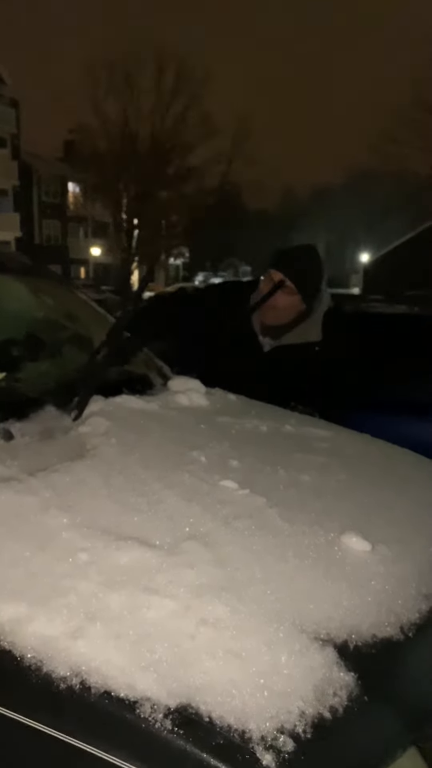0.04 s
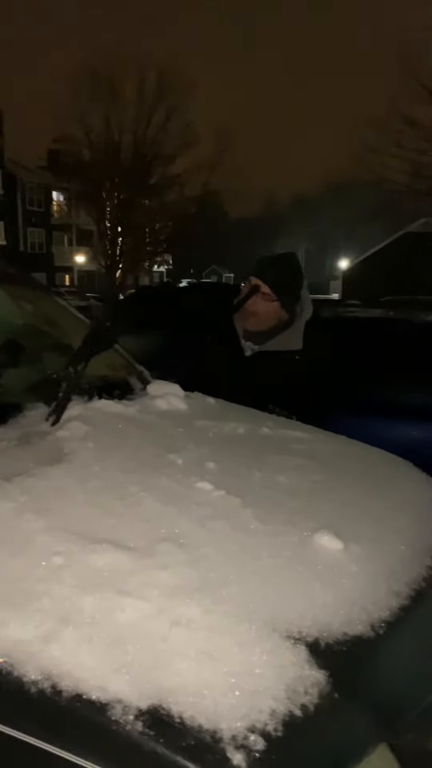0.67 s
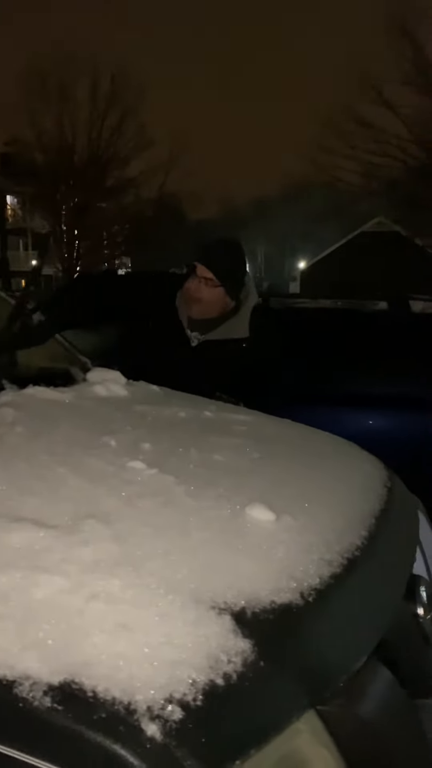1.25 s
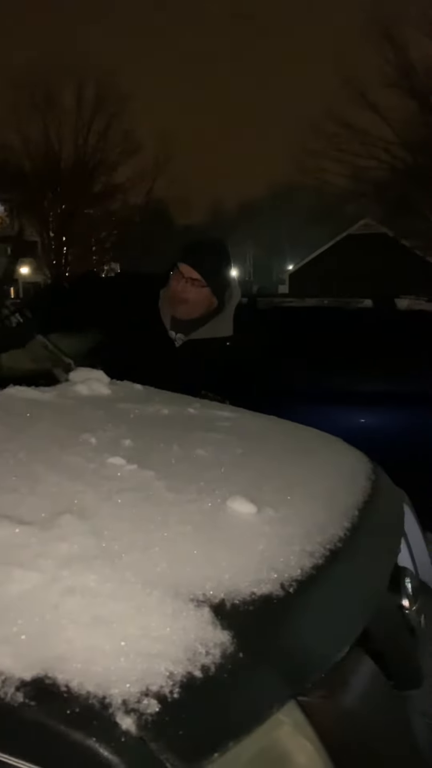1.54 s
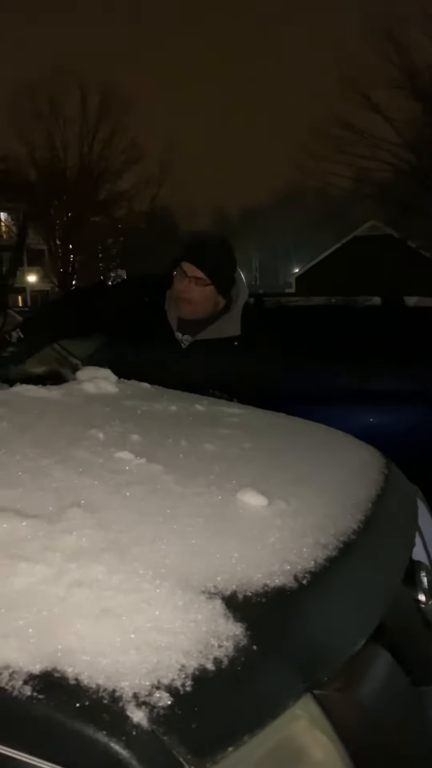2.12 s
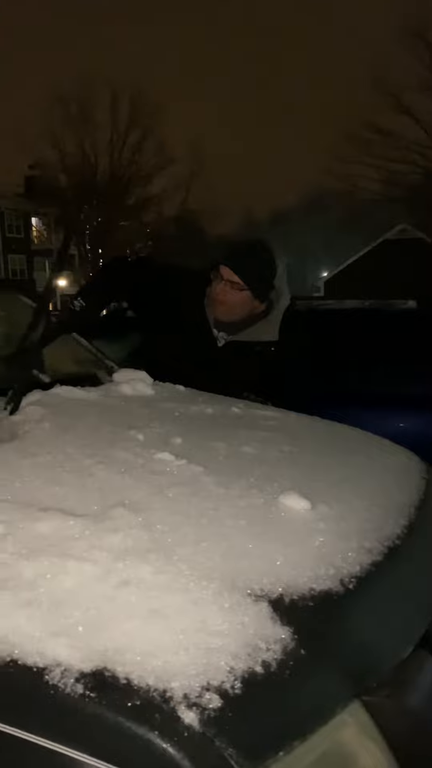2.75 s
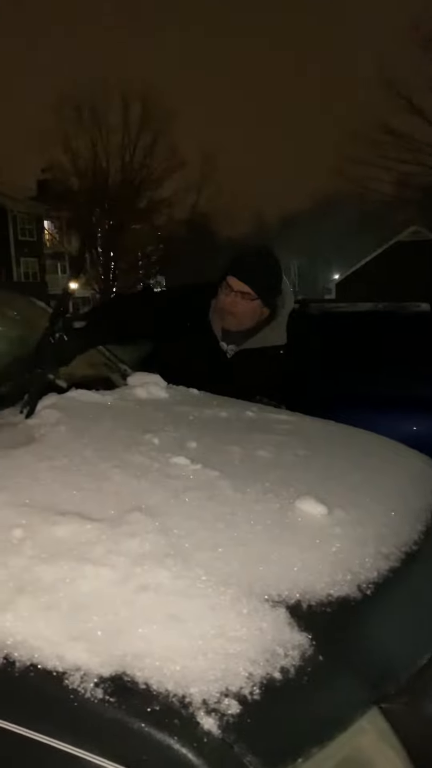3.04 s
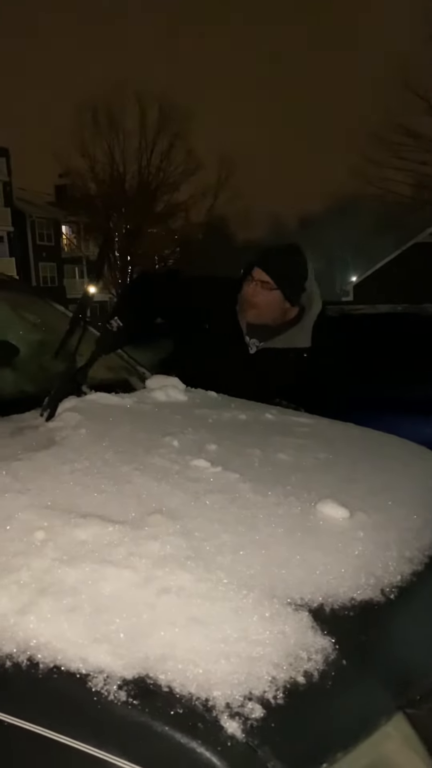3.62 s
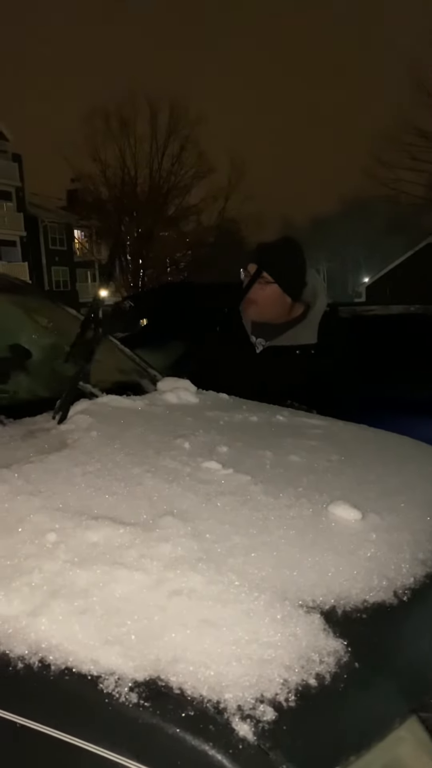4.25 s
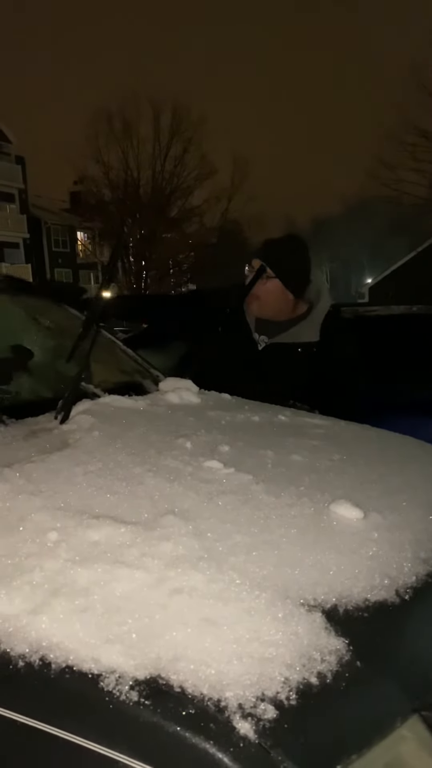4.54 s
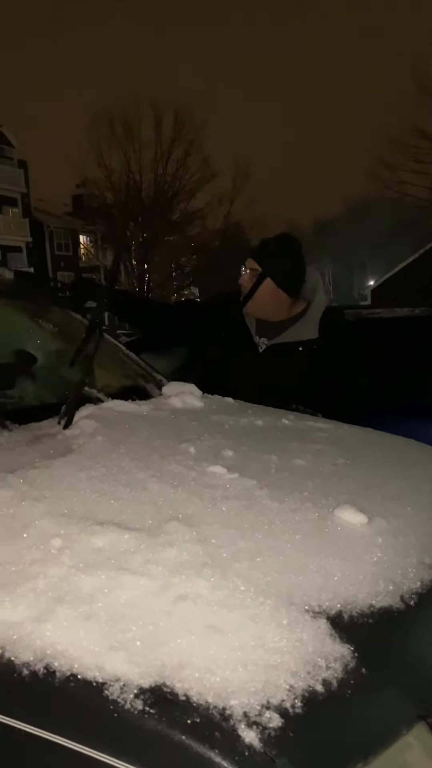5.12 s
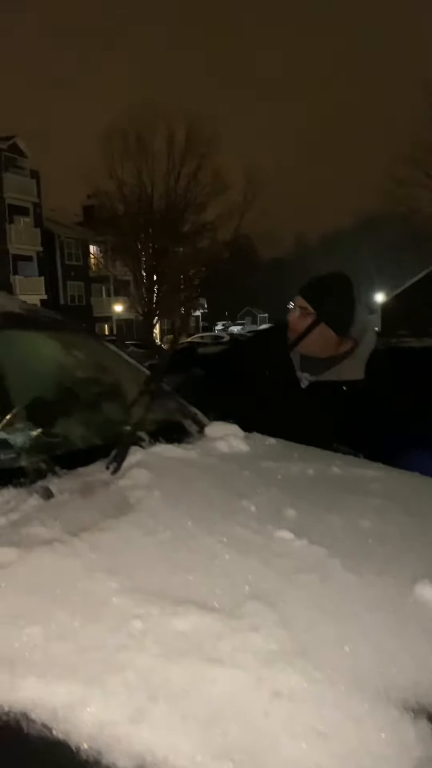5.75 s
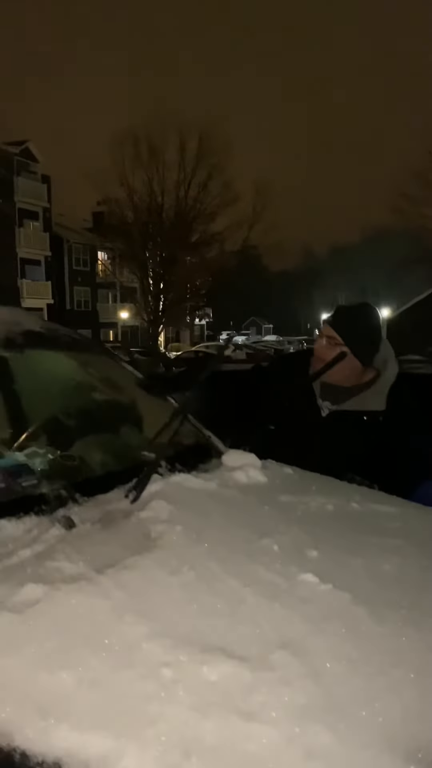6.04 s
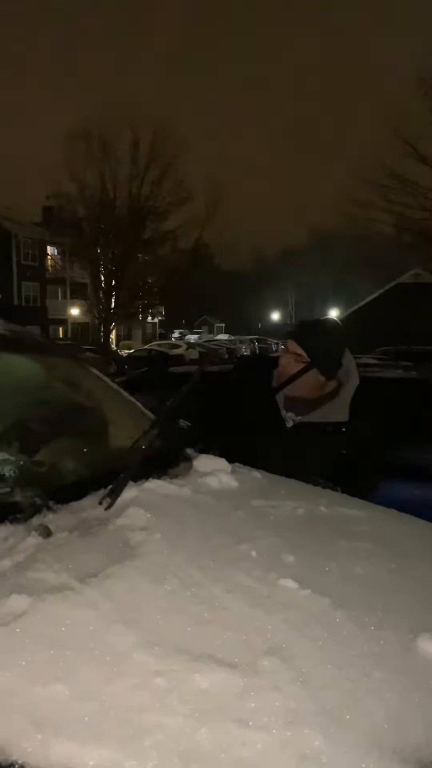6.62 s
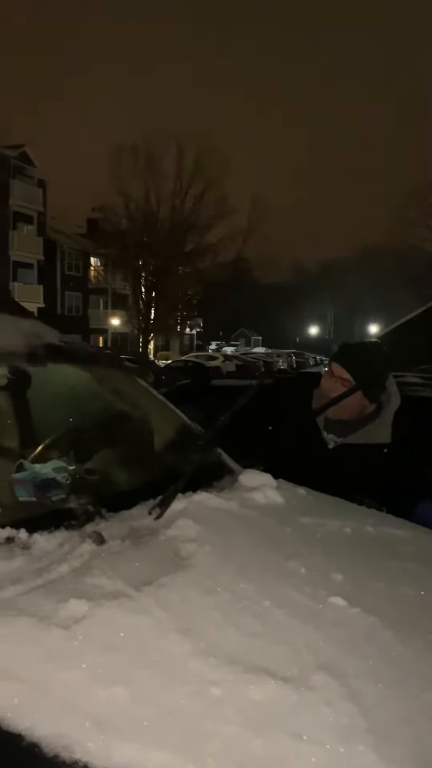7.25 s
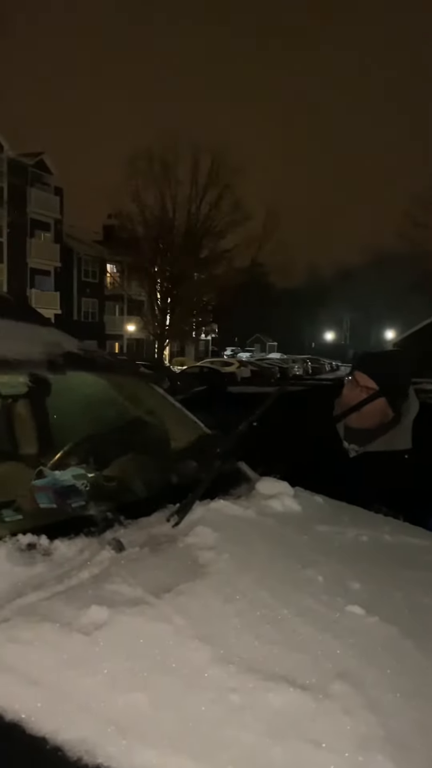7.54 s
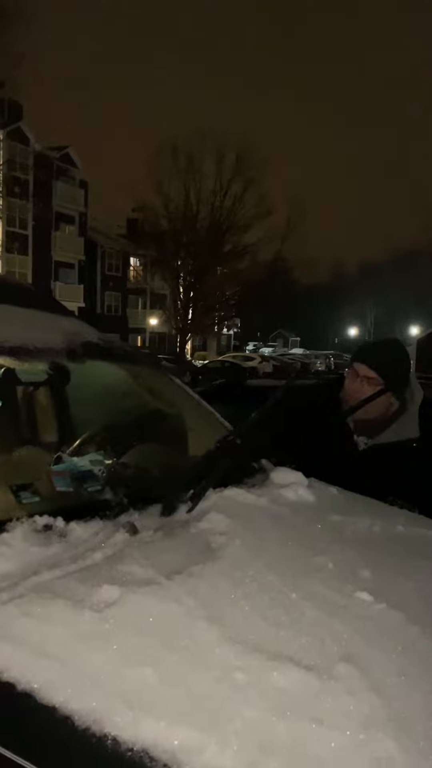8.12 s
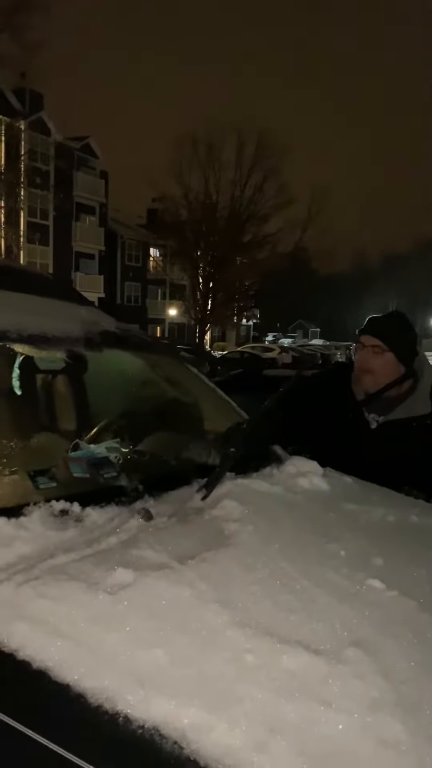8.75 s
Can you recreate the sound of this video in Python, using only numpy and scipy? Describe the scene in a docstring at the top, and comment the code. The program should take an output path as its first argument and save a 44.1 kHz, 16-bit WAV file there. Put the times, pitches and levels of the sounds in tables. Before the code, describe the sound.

Over a steady engine idle, harsh bursts of ice scraping on glass give way to light snow sweeps and plastic clacks.

```python
"""Beside a parked car at night, someone scrapes ice off the windscreen, then sweeps loose snow away.
The engine idles throughout. The plastic blade sticks and slips: each slip shatters a clump of ice
grains and shakes the glass. Chips snap off, the tool thumps and knocks, and the brush hisses through
snow and rubs once on bare glass. A stereo microphone listens from beside the bonnet."""
import sys
import numpy as np
from scipy import signal
from scipy.fft import rfft, irfft, next_fast_len
from scipy.io import wavfile
from scipy.ndimage import uniform_filter1d

SR = 44100
rng = np.random.default_rng(int(sys.argv[2]) if len(sys.argv) > 2 else 0)


def int16_out(signal):
    """Quantize to a 16-bit WAV file."""
    q = np.round(np.clip(np.atleast_2d(signal).T, -1, 1) * 32767)
    wavfile.write(sys.argv[1], SR, q.astype(np.int16))


N = 396018
TIME = np.arange(N) / SR
FFT_SIZE = next_fast_len(N + 4096)
HZ = np.fft.rfftfreq(FFT_SIZE, 1 / SR)


def amp(db):
    """Turns decibels into a gain."""
    return 10 ** (np.asarray(db) / 20)


def unit_rms(x):
    """Scales a sound so that the average of its channels has an rms level of 1."""
    return x / np.sqrt(np.mean(np.atleast_2d(x).mean(0) ** 2) + 1e-20)


def curves(table):
    """Joins a table's rows into curves over log frequency, one for each column after the first."""
    hz, *columns = np.transpose(table)
    return np.array([np.interp(np.log(HZ + 1), np.log(hz), column) for column in columns])


def add(track, start_s, sound):
    """Mixes a sound into a track."""
    part = track[max(round(start_s * SR), 0):][:len(sound)]
    part += sound[:len(part)]


def drift(per_s):
    """A smooth random wander, about 1 in size."""
    knots = rng.standard_normal(int(TIME[-1] * per_s) + 2)
    return unit_rms(np.interp(TIME * per_s, np.arange(len(knots)), knots))


def coloured(x, spectrum):
    """Turns each frequency of a sound up or down by a table."""
    return irfft(rfft(x, FFT_SIZE) * amp(curves(spectrum)[0]), FFT_SIZE)[..., :N]


def stereo(x, path):
    """Carries one signal (a point) or two unrelated ones (a wide source) to the microphone's two sides."""
    lead, likeness = curves(path)
    z = rfft(np.atleast_2d(x), FFT_SIZE)
    right = likeness * z[0] + np.sqrt(1 - likeness ** 2) * z[1] if len(z) == 2 else z[0]
    return irfft(np.array([z[0] * np.exp(.5j * lead), right * np.exp(-.5j * lead)]), FFT_SIZE)[:, :N]


# Idle speed. Each row: time in seconds, crankshaft turns per second.
IDLE_SPEED = [(0, 17.65), (.6, 17.75), (1.5, 17.5), (2.05, 17.8), (3, 17.48), (5, 17.6), (7.4, 17.47),
              (8, 17.7), (9, 17.8)]
# The engine's hum. Each row: a tone's cycles per crankshaft turn, relative level in dB.
HUM_TONES = [(2, -14), (3, -35), (4, -13), (6, -8.5), (7, -0.5), (8, -14.5), (10, -9.5), (12, -18.5),
             (14, -34), (17, -20.5), (18, -45), (24, -7), (26, -10), (47, -23)]
# The hum sinks as the microphone drifts away from the grille. Each row: time in seconds, gain in dB.
HUM_FADE = [(0, 0.5), (7.8, 0), (8.6, -3)]
# Tone colours of the rumble and the whirr. Each row: frequency in Hz, relative level in dB.
RUMBLE_COLOUR = [(18, -40), (26, -21), (33, 2), (46, 0), (70, 3), (150, 0.5), (220, -6), (400, -8),
                 (560, -12), (900, -39)]
WHIRR_COLOUR = [(350, -0.5), (700, 4.5), (1200, 2.5), (2000, -1.5), (2900, -3), (4300, -5), (6500, -12),
                (8000, -8), (10000, -12.5), (13000, -39), (15700, -32)]
# From engine to microphone. Each row: frequency in Hz, how far the left side leads in radians,
# how alike the two sides are from 0 to 1.
ENGINE_PATH = [(120, -.15, .965), (300, -.55, .78), (430, -1.5, .85), (1900, -2.3, .6), (2400, -4, .6),
               (4200, -6.28, .75), (5300, -9.4, .4), (6500, -12.57, .75), (8400, -15.7, .7),
               (12100, -22, .95), (15800, -28.3, .9)]

def engine(hum_db=-40, rumble_db=-43.0, whirr_db=-51, waver=0.32, throb=0.25, scatter_rad=0.48):
    """An idling engine: a wavering hum, a rumble that throbs once a turn, the whirr of belts and fan."""
    speed = np.interp(TIME, *np.transpose(IDLE_SPEED)) * (1 + .004 * drift(per_s=18))
    turns = np.cumsum(speed) / SR
    # the tones fall roughly into step once a turn, which makes the idle chug
    hum = np.zeros(N)
    for cycles, db in HUM_TONES:
        phase = 2 * np.pi * cycles * turns + scatter_rad * drift(per_s=1.51)
        hum += amp(db) * (1 + waver * drift(per_s=12)) * np.cos(phase)
    hum *= amp(np.interp(TIME, *np.transpose(HUM_FADE)))
    hum = np.sqrt(2) * stereo(hum, ENGINE_PATH)
    beat = np.cos(2 * np.pi * turns)
    air = stereo(rng.standard_normal((2, N)), ENGINE_PATH)
    rumble = unit_rms(coloured(air, RUMBLE_COLOUR) * (1 + throb * beat))
    whirr = unit_rms(coloured(air, WHIRR_COLOUR) * (1 + 0.03 * beat) * amp(0.7 * drift(per_s=23)))
    return amp(hum_db) * hum + amp(rumble_db) * rumble + amp(whirr_db) * whirr


def grains(per_s, spread_db):
    """Two streams of tiny clicks, most small and a few large."""
    sizes = amp(spread_db * np.minimum(rng.exponential(1, (2, N)), 4))
    return unit_rms(sizes * rng.choice([-1, 1], (2, N)) * (rng.random((2, N)) < per_s / SR))


def stick_slip(slips, size_db, fade_s, drag):
    """Loudness over time: each slip lets go a burst that dies fast, on top of a steady drag."""
    fade = np.exp(-1 / (fade_s * SR))
    power = signal.lfilter([1 - fade], [1, -fade], slips * amp(size_db) ** 2)
    # the arm keeps the average effort steady, whatever single slips do
    power /= abs(uniform_filter1d(power, SR // 35)) + 1e-9
    return np.sqrt(power + drag ** 2) / np.sqrt(1 + drag ** 2)


def crackle(slips, size_db, tint_db, fade_s, drag):
    """Bursts of breaking grains; each slip breaks ice of another size, so it favours other bands."""
    centres_hz = [500, 1500, 2800, 4500, 7000, 10500, 14000]
    dust = rfft(grains(per_s=20000, spread_db=2.0), FFT_SIZE)
    bursts = np.zeros((2, N))
    for one_band in np.eye(len(centres_hz)):
        band = irfft(dust * np.interp(HZ, centres_hz, one_band), FFT_SIZE)[:, :N]
        bursts += band * stick_slip(slips, size_db + tint_db * rng.standard_normal(N), fade_s, drag)
    return bursts


def body_bounce(x, delay_s, share):
    """Adds a reflection off the car body, whose delay shifts as the arm moves."""
    lag = np.round(SR * delay_s * np.exp(.25 * drift(per_s=4))).astype(int)
    return x + share * x[:, np.clip(np.arange(N) - lag, 0, N - 1)]


def roaming(x, depth_db, width_hz, hold_s):
    """As the tool travels over the glass, narrow resonances come forward and sink back."""
    hz, t, z = signal.stft(x, SR, nperseg=512, noverlap=384)
    patches = uniform_filter1d(rng.standard_normal(z.shape[1:]), max(int(width_hz / hz[1]), 1), axis=0)
    patches = uniform_filter1d(patches, max(int(hold_s / t[1]), 1), axis=1)
    patches = unit_rms(patches.ravel()).reshape(patches.shape)
    return signal.istft(z * amp(depth_db * patches), SR, nperseg=512, noverlap=384)[1][:, :N]


def resonate(x, hz, width_hz):
    """Picks a note out of noise: a resonance that follows a changing pitch."""
    turn = np.exp(2j * np.pi * np.cumsum(hz) / SR)
    fade = np.exp(-np.pi * width_hz / SR)
    return 2 * (turn * signal.lfilter([1 - fade], [1, -fade], x * turn.conj())).real


def ringing(tones):
    """An object rings after one blow; neighbouring tones swing opposite ways."""
    t = TIME[:SR // 4]
    return sum((-1) ** k * amp(db - 60 * t / ring_s) * np.sin(2 * np.pi * hz * t)
               for k, (hz, db, ring_s) in enumerate(tones))


def arm_move(start, length, crest, swell_db_per_s, attack_s, release_s, ease_in=0.13, ease_off=1.75):
    """Loudness of one move: it takes hold, swells to its crest, eases off faster and lifts away."""
    gain, t = np.zeros(N), TIME[:int((length + 6 * release_s) * SR)]
    crest_s = crest * length
    past_crest = np.minimum(t, length) - crest_s
    lean_db = -swell_db_per_s * np.maximum(-past_crest, ease_off * past_crest)
    grip = np.minimum(t / (attack_s + ease_in * crest_s), 1)  # a late crest means a gentler start
    lift = np.exp(-np.maximum(t - length, 0) / release_s)
    add(gain, start, amp(lean_db) * grip * lift)
    return gain


# Scraper strokes: a push crests early and runs out, a pull builds until the blade lifts.
# Each row: start in seconds, length in seconds, crest as a share of the length, swell in dB per second,
# rasp level in dB, fizz in dB, push on the glass in dB, blade note in Hz, its level in dB,
# glass note in Hz, its level in dB. The last four levels are relative to the rasp.
BLADE_STROKES = [(0.0, 0.15, 0, 2, -32, -4.5, -12.5, 2700, -11, 394, -12),
                 (.16, 0.066, 0.5, 110, -31, -4.5, -7, 2840, -9.5, 300, -9),
                 (.396, 0.11, 1, 116, -23.5, -1.5, -3, 2600, -14, 201, -2),
                 (1.192, 0.092, 0.09, 93, -21.5, 1, -7, 2750, -22, 763, -8.5),
                 (1.288, 0.06, 0.37, 62, -36, 0.5, 3, 2400, -9, 750, -24),
                 (1.428, 0.16, 0.81, 108, -30, 0, -11, 2190, -22, 450, -33),
                 (1.925, 0.14, 0.27, 107, -23.5, 1, -3, 2600, -22, 460, -12.5),
                 (2.076, 0.055, 0.58, 150, -33.5, 0, -1.5, 2700, -29, 660, -14),
                 (2.219, 0.053, 0.2, 20, -46, 0, -1, 2410, -7, 433, -17),
                 (2.275, 0.11, 0.92, 44, -27.5, .5, -11.5, 2200, -11, 413, -10.5),
                 (2.824, 0.113, 0.29, 111, -22.5, 0, -4.5, 2600, -17, 736, -22),
                 (3.153, 0.03, 0.34, 70, -33.5, 2, -2, 2700, -14, 650, -14),
                 (3.212, 0.035, 0.4, 40, -31.5, 3, -25, 2710, -9, 724, -10),
                 (3.382, 0.12, 0.01, 147, -41, 0, 0, 2700, -13, 450, 3),
                 (3.49, 0.16, 0.82, 122, -30, -1.5, -1, 2780, -14, 198, -3.5),
                 (3.86, 0.13, 0, 10, -47, -2, -1, 2690, -5.5, 300, -12)]
# The blade skips and catches for an instant.
# Each row: start in seconds, rasp level in dB, fizz in dB relative to the rasp.
BLADE_CATCHES = [(1.435, -52, -1), (1.464, -46, -9), (1.875, -35.5, 7), (1.917, -41, 0),
                 (2.966, -36.5, 2.5), (2.988, -40, 1), (3.068, -41.5, 0), (3.084, -41, -4),
                 (3.109, -38, -1), (3.192, -41, -4), (3.257, -41, -5), (3.289, -34.5, -3)]

def blade_strokes(bite_s=0.0026, lift_s=0.0048, spring_back_s=0.013, flex_share=0.94, note_share=0.63):
    """The arm works the blade: gives the loudness of each part of the scrape, and two pitches."""
    # a catch is a tiny stroke that crests at once
    catches = [(start, 0.015, 0, 300, db, fizz_db, -6, 2700, -22, 450, -6)
               for start, db, fizz_db in BLADE_CATCHES]
    rasp, fizz, push, blade_note, glass_note = np.zeros((5, N))
    blade_pitch, glass_pitch = np.full(N, 2700.0), np.full(N, 450.0)
    for stroke in sorted(map(tuple, list(BLADE_STROKES) + catches)):
        *timing, swell, db, fizz_db, push_db, blade_hz, blade_db, glass_hz, glass_db = stroke
        contact = arm_move(*timing, swell, bite_s, lift_s)
        flexing = arm_move(*timing, flex_share * swell, bite_s, spring_back_s)
        rasp += amp(db) * contact
        fizz += amp(db + fizz_db) * contact
        push += amp(db + push_db) * flexing
        glass_note += amp(db + glass_db) * flexing
        # pressure damps the blade's note, so it swells less than the rasp
        blade_note += amp(db + blade_db) * arm_move(*timing, note_share * swell, bite_s, lift_s)
        # where strokes overlap, the louder one sets the pitch
        blade_pitch[amp(db) * contact > rasp / 2] = blade_hz
        glass_pitch[amp(db + glass_db) * flexing > glass_note / 2] = glass_hz
    return rasp, fizz, push, blade_note, glass_note, blade_pitch, glass_pitch


# Tone colours of crushed ice and of fine shards. Each row: frequency in Hz, relative level in dB.
RASP_COLOUR = [(400, -73), (850, -5), (1300, -10.5), (1650, -4.5), (2000, -7.5), (2700, -4.5), (3600, -8),
               (4250, -4), (5600, -12), (6500, -5.5), (7700, -18), (9500, -53)]
FIZZ_COLOUR = [(6000, -70), (8000, -4), (9300, -4), (10300, 3), (12000, -3), (13700, 2.5), (14900, -4),
               (15700, -6)]
# The blade's higher resonances. Each row: pitch in Hz, width in Hz, level in dB relative to the rasp.
BLADE_OVERTONES = [(4160, 97, -21.5), (5334, 83, -14), (6340, 130, -18)]
# The laminated windscreen's short ring.
# Each row: pitch in Hz, relative level in dB, seconds to fade by 60 dB.
GLASS_TONES = [(68, -10, 0.21), (110, -9.5, 0.31), (157, -20, 0.041), (200.6, -4.5, 0.09),
               (251, -8.5, 0.098), (301, -4.5, 0.12), (353, -7.5, 0.07), (449.6, -2.5, 0.1),
               (552, -7.5, 0.065), (654, -0.5, 0.035), (780, 0, 0.032), (880, 1, 0.015)]
# From windscreen to microphone. Each row: frequency in Hz, how far the left side leads in radians,
# how alike the two sides are from 0 to 1.
GLASS_PATH = [(100, -.1, .94), (2300, 0, .9), (2900, 1, .85), (5300, .9, .68), (6500, 0, .88),
              (7600, -.7, .68), (8400, -3.14, .94), (12100, -9.42, .95), (15800, -15.7, .92)]

def scraper(slips_per_s=540, spurts_per_s=600, bend=0.015, blade_width_hz=210, glass_width_hz=140):
    """The blade crushes ice: a rasp, spurts of fine shards, and the ringing of blade and windscreen."""
    slips = rng.random(N) < slips_per_s / SR
    size_db = 1.7 * rng.standard_normal(N)
    ice = crackle(slips, size_db, tint_db=3.3, fade_s=.0011, drag=.72)
    ice = stereo(body_bounce(ice, delay_s=.0016, share=0.35), GLASS_PATH)
    patchy_ice = roaming(ice, depth_db=3.6, width_hz=270, hold_s=.06)
    effort, fizz, push, blade_note, glass_note, blade_pitch, glass_pitch = blade_strokes()
    rasp = unit_rms(coloured(patchy_ice, RASP_COLOUR)) * effort
    spurts = stick_slip(rng.random(N) < spurts_per_s / SR, size_db, fade_s=.0005, drag=1.1)
    shards = unit_rms(coloured(patchy_ice * spurts, FIZZ_COLOUR)) * fizz
    # the blade bends as it travels, which shifts all its resonances together
    flex = 1 + bend * drift(per_s=18)
    blade = unit_rms(resonate(ice, blade_pitch * flex, blade_width_hz)) * blade_note
    for hz, width_hz, db in BLADE_OVERTONES:
        blade += effort * amp(db) * unit_rms(resonate(ice, hz * flex, width_hz))
    # the glass's strongest note depends on where the blade presses
    boom = resonate(ice, glass_pitch, glass_width_hz)
    boom = unit_rms(resonate(boom, glass_pitch, glass_width_hz)) * glass_note
    glass = ringing(GLASS_TONES)
    shake = signal.oaconvolve(unit_rms(ice) * push, glass[None] / np.linalg.norm(glass))[:, :N]
    return rasp + shards + blade + boom + shake


# Ice chips. Each row: start in seconds, relative strength in dB, change to its treble in dB.
ICE_CHIPS = [(.067, -9, -20), (.112, -2.5, -18), (0.152, -4.5, -12), (0.178, -5, -19), (0.193, -5, -14),
             (.266, -24, -19), (0.444, -12, -14), (.505, -2.5, -7), (.63, -13, -12), (0.781, -16.5, -11),
             (1.2034, -13, 6), (1.321, -9, -7), (1.325, -6.5, -10), (1.341, -8, -16), (1.3815, -18, -15),
             (1.406, -9, -10), (1.466, -15, -14), (1.534, -18, -6), (1.578, -7, -8), (1.893, -12, -1),
             (1.952, -3, -14), (1.966, -5, -16), (1.989, -5, -12), (2.028, -6.5, -19), (2.041, -17, -12),
             (2.055, -12, -8), (2.128, -11, -23), (2.224, -23, -9), (2.26, -14, -11), (2.277, -9, -15),
             (2.29, -3, -21), (2.313, -6, -18), (2.566, -21, -11), (2.829, -6.5, 2), (2.849, -6, 0),
             (2.868, 1.5, -8), (2.92, 0, -19), (2.931, -12, -6), (3.075, -17, -13), (3.115, -15, -10),
             (3.121, -17, -9), (3.126, -13, -12), (3.195, -8, -8), (3.2007, -14, -11), (3.229, -6, -12),
             (3.247, -14, 3), (3.26, -15, -12), (3.292, -11.5, -9), (3.623, -9, -20), (3.629, -7, -18),
             (3.652, -14, -10), (4.025, -34, 4), (5.223, -38, -2), (5.3965, -24, -5), (8.7842, -17, -9)]

def chips(fade_s=0.0026, gain_db=-1, shard_db=3):
    """Each flake of ice snaps off in a spurt of cracks a few milliseconds long."""
    t = TIME[:SR // 40]
    low, high = np.zeros((2, N))
    for start, db, treble_db in ICE_CHIPS:
        crack = rng.standard_normal(len(t)) * (t / fade_s) ** .5 * np.exp(-t / fade_s)
        crack *= amp(db + gain_db) / abs(crack).max()
        add(low, start, crack)
        add(high, start, crack * amp(treble_db + shard_db))
    return stereo(coloured(low, RASP_COLOUR) + coloured(high, FIZZ_COLOUR), GLASS_PATH)


BRUSH_IN_S, BRUSH_OUT_S = 0.0039, 0.014  # loose snow gives way and settles more softly than ice
# Brush sweeps. Each row: start in seconds, length in seconds, crest as a share of the length,
# swell in dB per second, hiss level in dB, relative swish level in dB.
SNOW_SWEEPS = [(0.329, 0.031, .7, 200, -59, -45), (0.774, 0.1, 0, 92, -60, -46),
               (1.698, 0.062, 0.32, 220, -55, -43.5), (2.7, 0.14, .95, 70, -57, -46.5),
               (5.67, 0.17, 0.62, 140, -49, -47.5), (6.466, 0.081, 0.9, 40, -49, -51),
               (6.549, 0.066, 0.75, 150, -56, -42), (7.11, 0.19, 0.86, 97, -45.5, -43.5),
               (7.797, 0.14, 0.55, 210, -49.5, -44), (7.957, 0.466, 0.58, 15, -57.5, -48.5),
               (8.849, 0.036, 0.84, 200, -61, -46)]
# Tone colour of snow crumbs. Each row: frequency in Hz, relative level in dB.
SWISH_COLOUR = [(300, -28), (700, -2), (1100, -2), (1800, -1), (2700, 0.5), (3700, -0.5), (4700, 2),
                (6000, -0.5), (7500, -3), (9500, -8.5)]

def brush(flicks_per_s=300, swish_gain_db=-1):
    """Light sweeps push loose snow along: a fine hiss of powder and a coarser swish of crumbs."""
    flicks = rng.random(N) < flicks_per_s / SR
    snow = grains(per_s=9000, spread_db=2.6)
    snow *= stick_slip(flicks, size_db=4.5 * rng.standard_normal(N), fade_s=.002, drag=.8)
    snow = stereo(roaming(snow, depth_db=2.5, width_hz=350, hold_s=.1), GLASS_PATH)
    hiss, swish = np.zeros((2, N))
    for *move, hiss_db, swish_db in SNOW_SWEEPS:
        contact = arm_move(*move, BRUSH_IN_S, BRUSH_OUT_S)
        hiss += amp(hiss_db) * contact
        swish += amp(swish_db + swish_gain_db) * contact
    return unit_rms(coloured(snow, FIZZ_COLOUR)) * hiss + unit_rms(coloured(snow, SWISH_COLOUR)) * swish


# Dull thumps. Each row: start in seconds, relative level in dB, pitch in Hz.
GLASS_THUMPS = [(0.47, -24, 110), (0.512, -25, 118), (1.243, -19, 450), (1.355, -30, 110),
                (1.946, -20, 107), (2.856, -23, 62), (2.884, -16.5, 105), (3.178, -26, 101),
                (3.613, -19.5, 178), (3.621, -18, 120), (3.654, -19.5, 88), (5.227, -32, 196),
                (5.24, -26, 146), (5.247, -28.5, 288), (5.414, -31, 110), (6.989, -20, 139),
                (7.687, -18, 100), (7.88, -21, 83.8), (8.789, -26, 76)]

def thumps(swell_s=0.0048, gain_db=-2):
    """The whole windscreen flexes briefly as the tool's weight lands on it."""
    t, track = TIME[:SR // 8], np.zeros(N)
    swell = t / swell_s * np.exp(1 - t / swell_s)
    for start, db, hz in GLASS_THUMPS:
        add(track, start, amp(db + gain_db) * swell * np.sin(2 * np.pi * hz * t))
    return stereo(track, GLASS_PATH)


# Knocks. Each row: start in seconds, relative clack level in dB, then glass bump, frost crunch and
# tip ring, each in dB relative to the clack, and contact time in seconds.
TOOL_KNOCKS = [(0.512, -29.5, 10.5, -10, -6, 0.002), (4.421, -38, -8, -7, -4, 0.0021),
               (5.2233, -32.5, 8.5, -6, 4, 0.00073), (5.3964, -15, -24, -4.5, -10, 0.0025),
               (5.3986, -26, -3, -12, -14, 0.0023), (6.161, -38.5, 3, -1, 3, 0.0018),
               (6.981, -44, -5, 12, 8, 0.0026), (7.678, -27.5, 7.5, 1.5, -7, 0.0047),
               (7.84, -32.5, -3, -8, -18, 0.0025), (7.87, -32, -10, -11, -2, 0.0034),
               (8.235, -34, 1, 0, -15, 0.0031), (8.26, -33, 2.5, 4, -16, 0.0028),
               (8.283, -33.5, -16, -5, -6, 0.005), (8.378, -40.5, -1, 9, -12, 0.0042),
               (8.971, -30, -17, 3.5, -22, 0.0011)]
# The ring of the plastic tool and of its thin tip.
# Each row: pitch in Hz, relative level in dB, seconds to fade by 60 dB.
TOOL_TONES = [(547, 4.5, 0.045), (1290, 5.5, 0.013), (1600, 3, 0.024), (2070, 3.5, 0.02), (2400, -1, 0.014),
              (2970, -0.5, 0.024), (3600, -6, 0.019), (4260, 1.5, 0.024), (6320, -14, 0.023),
              (7450, -8, 0.009)]
TIP_TONES = [(2450, -0.5, 0.018), (2780, 2, 0.016), (3200, -5, 0.014)]

def knocks(gain_db=1):
    """The tool hits frosted glass: plastic clacks, the glass bumps, the tip rings and frost crunches."""
    glass, tip = ringing(GLASS_TONES), ringing(TIP_TONES)
    solids, frost = np.zeros((2, N))
    for start, clack_db, bump_db, crunch_db, tip_db, contact_s in TOOL_KNOCKS:
        progress = TIME[:len(glass)] / contact_s
        clack = ringing([(hz, db + rng.uniform(-1.1, 1), ring_s) for hz, db, ring_s in TOOL_TONES])
        force = np.sin(np.pi * np.minimum(progress, 1)) ** 2  # a longer contact gives a duller bump
        bump = signal.fftconvolve(force, glass)[:len(glass)]
        crunch = rng.standard_normal(len(glass)) * np.sqrt(progress) * np.exp(-progress)
        for track, db, part in [(solids, 0, clack), (solids, bump_db, bump),
                                (solids, tip_db, tip), (frost, crunch_db, crunch)]:
            add(track, start, amp(clack_db + gain_db + db) * part / abs(part).max())
    return stereo(solids + coloured(frost, SWISH_COLOUR), GLASS_PATH)


# The brush head on bare glass. Each row: start in seconds, length in seconds, crest as a share of the
# length, swell in dB per second, level in dB, pitch in Hz, width of the resonance in Hz.
BRUSH_RUBS = [(8.203, 0.2, 0.26, 50, -47, 1020, 150)]

def brush_rub():
    """The brush head slips over the glass and sounds one faint, hollow note."""
    slips = grains(per_s=2200, spread_db=1.5)[0]
    track = np.zeros(N)
    for *move, db, hz, width_hz in BRUSH_RUBS:
        note = unit_rms(resonate(slips, np.full(N, hz), width_hz))
        track += amp(db) * arm_move(*move, BRUSH_IN_S, BRUSH_OUT_S) * note
    return stereo(track, GLASS_PATH)


# The band that a house front throws back: low edge in Hz, high edge in Hz.
SLAP_BAND_HZ = (1600, 2800)

def car_park(x, ring_s=1.0, tail_db=-27, slap_db=-15, slap_s=0.065, blur_s=0.03):
    """Snow swallows most echoes; nearby cars return a faint tail, and a house front a blurred slap."""
    t = TIME[:SR // 2]
    tail, slap = rng.standard_normal((2, 2, len(t)))
    tail = tail * amp(-60 * t / ring_s) * (t > .004)
    slap = signal.sosfilt(signal.butter(1, SLAP_BAND_HZ, "bandpass", fs=SR, output="sos"), slap)
    slap = slap * np.exp(-abs(t - slap_s) / blur_s) * (t > slap_s)
    echoes = amp(tail_db) * tail / np.linalg.norm(tail[0])
    echoes += amp(slap_db) * slap / abs(rfft(slap[0])).max()
    return x + signal.oaconvolve(x, echoes, axes=1)[:, :N]


def scene():
    """Work on the windscreen over the idling engine, which lies a little to the right."""
    work = scraper() + brush() + brush_rub() + chips() + knocks() + thumps()
    return car_park(work) + engine() * amp([[-.7], [.7]])


def record(dry, bass_cut_hz=27, treble_cut_hz=16000):
    """The microphone drops the deepest bass, and the recorder cuts the highest treble."""
    bass_cut = signal.butter(4, bass_cut_hz, "highpass", fs=SR, output="sos")
    treble_cut = signal.firwin(511, treble_cut_hz, window=("kaiser", 9), fs=SR)
    return signal.oaconvolve(signal.sosfilt(bass_cut, dry), treble_cut[None], "same")


dry = scene()
out = record(dry)
int16_out(out)
```